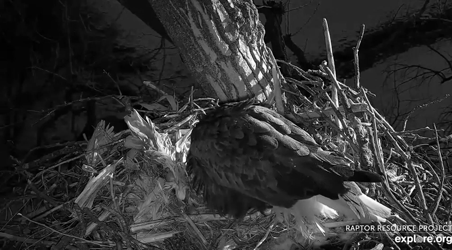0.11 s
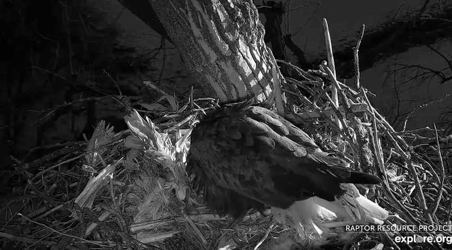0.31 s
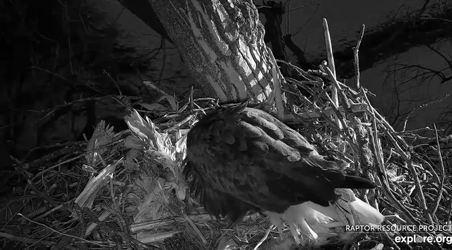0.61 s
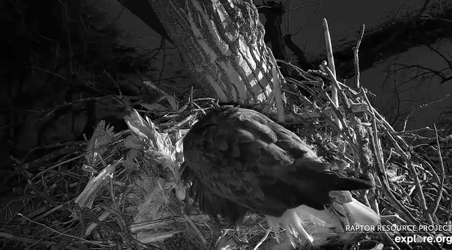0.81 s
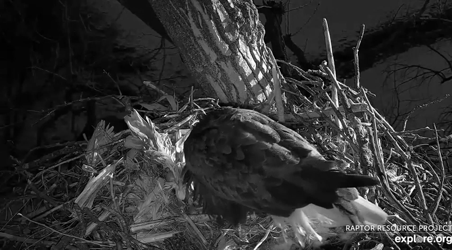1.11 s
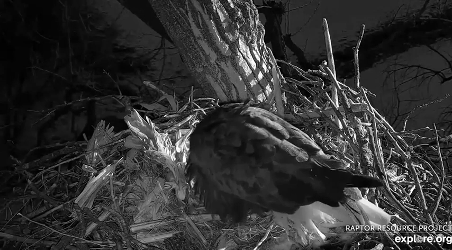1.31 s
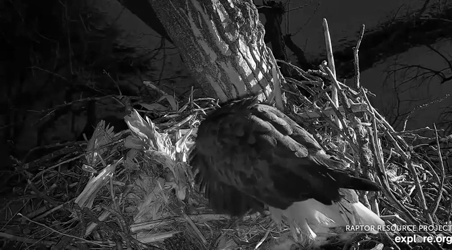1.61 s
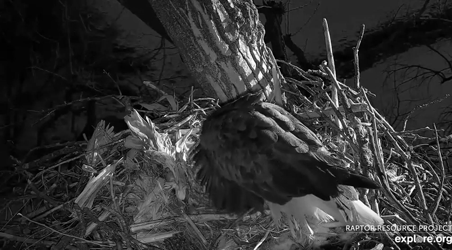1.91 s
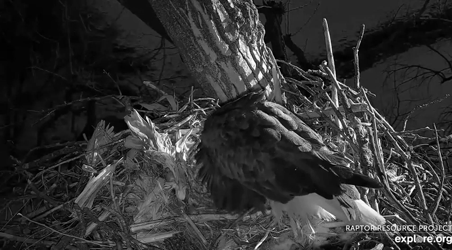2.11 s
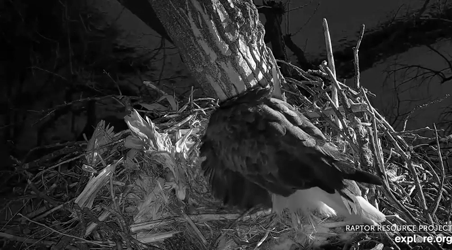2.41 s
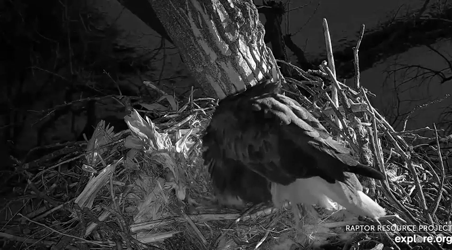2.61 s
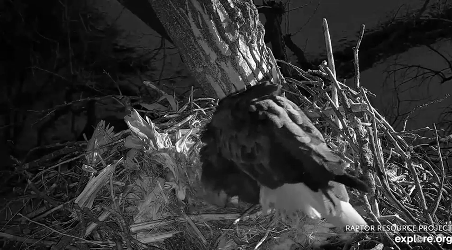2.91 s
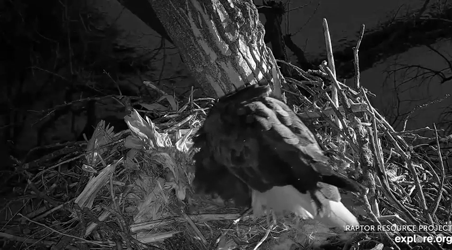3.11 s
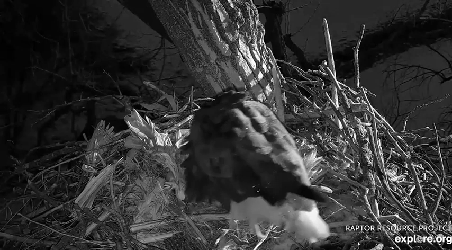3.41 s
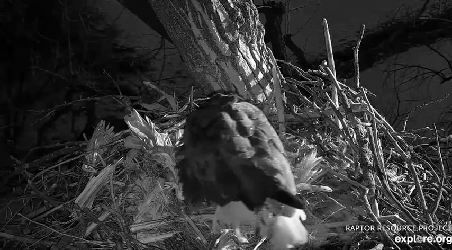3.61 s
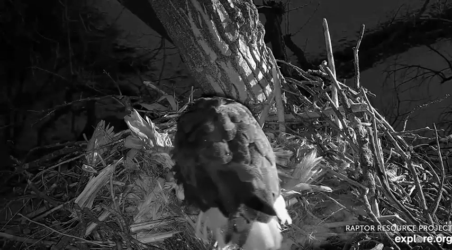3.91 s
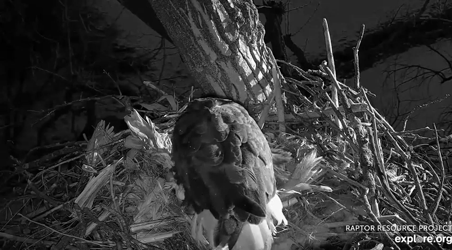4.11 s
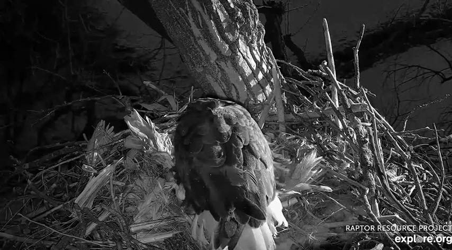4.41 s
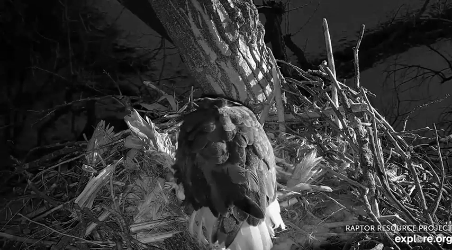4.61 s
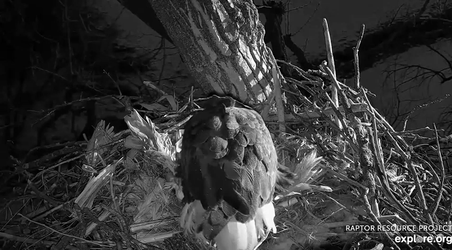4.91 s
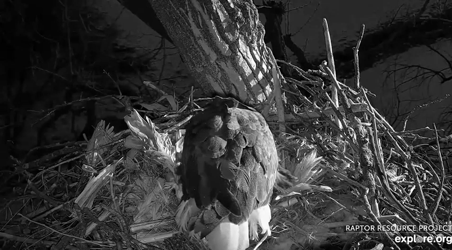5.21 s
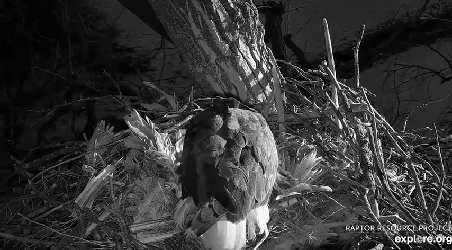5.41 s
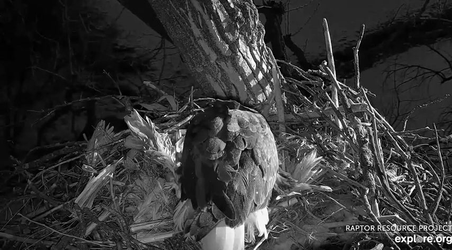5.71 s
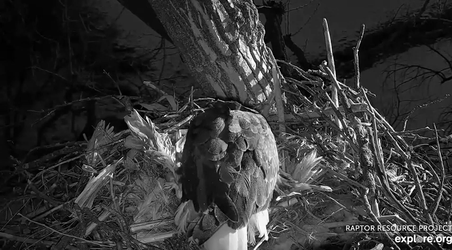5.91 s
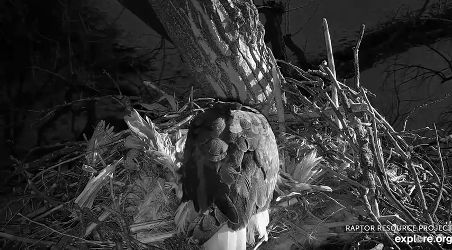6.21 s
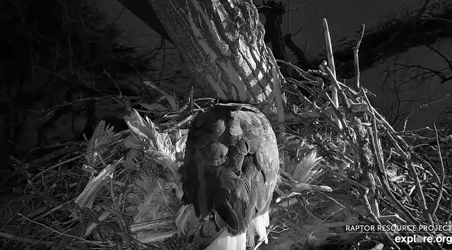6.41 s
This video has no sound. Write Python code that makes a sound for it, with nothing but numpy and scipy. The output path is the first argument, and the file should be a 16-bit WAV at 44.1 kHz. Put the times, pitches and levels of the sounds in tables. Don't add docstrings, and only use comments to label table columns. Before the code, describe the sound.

Outdoor nest in wooded surroundings, with constant low-to-mid water noise behind. An eagle nearby utters rapid piercing chirps and gliding whistles in three bursts, early, middle and end, the high ones splintering hoarsely. Between them are a short stuttering wooden creak, light plumage rustle, dry twig ticks and faint bird notes. The close microphone gives slightly gritty, overloaded loud notes with a metallic edge, limited treble and a bright tree echo.

```python
import sys
import numpy as np
from scipy import signal
from scipy.fft import rfft, irfft, next_fast_len
from scipy.io import wavfile
from scipy.ndimage import uniform_filter1d, map_coordinates

SR = 44100
rng = np.random.default_rng(int(sys.argv[2]) if len(sys.argv) > 2 else 0)


def invert_db(level):
    return 10 ** (np.asarray(level, dtype=float) / 20)


def digitize_waveform(pressure):
    field = np.atleast_2d(pressure).T
    bounded = np.clip(field, -1, 1)
    quanta = np.round(bounded * 32767).astype(np.int16)
    wavfile.write(sys.argv[1], SR, quanta)


N = 289737

# start_s, length_ms, level_db
HOARSE_STRETCHES = [
    (0.53, 65, -40),
    (0.635, 75, -38),
    (0.795, 55, -32.5),
    (2.0, 110, -62),
    (3.56, 105, -38),
    (3.67, 95, -36.5),
    (3.761, 80, -41),
    (6.101, 170, -38),
    (6.24, 88, -38),
]


def unit(x):
    return x / np.sqrt(np.mean(x ** 2) + 1e-20)


def along(hz_points, values, hz):
    return np.interp(np.log(hz + 1), np.log(np.asarray(hz_points) + 1), values)


def filtered(x, response):
    m = next_fast_len(N + SR // 2)
    return irfft(rfft(x, m) * response(np.fft.rfftfreq(m, 1 / SR)), m)[:N]


def coloured(points):
    hz_points, db = np.transpose(points)
    return unit(filtered(rng.standard_normal(N), lambda hz: invert_db(along(hz_points, db, hz))))


def wobble(rate_hz):
    knots = rng.standard_normal(int(N * rate_hz / SR) + 4)
    return map_coordinates(knots, [np.arange(N) * rate_hz / SR])


def mode(hz, centre_hz, width_hz):
    return 1j * hz * width_hz / (centre_hz ** 2 - hz ** 2 + 1j * hz * width_hz)


def impulses(start_s, peak_db):
    blows = np.zeros(N)
    for s, db in zip(start_s, peak_db):
        blows[round(s * SR)] = invert_db(db)
    return blows


def dying(t60_s):
    return invert_db(-60 * np.arange(SR // 20) / SR / t60_s)


def stream():
    # hz, level_db (per Hz)
    water_spectrum = [(12, -51), (20, -22), (64, -7), (97, -7.5), (252, -5.5), (295, -7), (450, -4.5),
                      (743, -0.5), (1480, -6), (1870, -12.5), (3530, -25), (4590, -28), (5520, -27),
                      (9870, -38.5), (11000, -48), (14300, -84), (22000, -120)]
    water_db, drone_db, drone_hz = -33, -59, 74.6
    z = signal.stft(coloured(water_spectrum), nperseg=512)[2]
    patches = uniform_filter1d(uniform_filter1d(rng.standard_normal(z.shape), 3, 0), 8, 1)
    rush = signal.istft(z * invert_db(1.92 * unit(patches)), nperseg=512)[1][:N]
    drone = unit(filtered(rng.standard_normal(N), lambda hz: mode(hz, drone_hz, 2.6) ** 2))
    swell_db = 0.6 * wobble(3.35)
    return invert_db(water_db + swell_db) * unit(rush) + invert_db(drone_db) * drone


def valley(x):
    # hz, t60_s, level_db
    decay_bands = [(3300, 0.56, -4), (3420, 0.97, -7), (4000, 0.6, 0.5), (4400, 0.5, -2.5), (5300, 0.35, 2),
                   (6260, 0.19, 1), (7150, 0.63, 7), (10400, 0.44, -2)]
    gap_samples = 250
    band_hz, t60_s, band_db = np.transpose(decay_bands)
    hz, t, z = signal.stft(rng.standard_normal(SR), SR, nperseg=256)
    start_db = along(band_hz, band_db, hz)[:, None]
    fade_db = start_db - 60 * t / along(band_hz, t60_s, hz)[:, None]
    near_branches = 1 + invert_db(1 - 60 * t / 0.06)
    tail = signal.istft(z * invert_db(fade_db) * near_branches, SR, nperseg=256)[1]
    tail *= invert_db(2.5 * wobble(60)[:len(tail)])
    return signal.fftconvolve(np.pad(x, (gap_samples, 0)), tail / np.linalg.norm(tail))[:N]


def rustle():
    # start_s, level_db
    brushes = [
        [(1.68, -58), (1.72, -42), (1.8, -57)],
        [(2.6, -70), (2.736, -51), (3.3, -71)],
    ]
    t = np.arange(N) / SR
    level = sum(invert_db(np.interp(t, *np.transpose(rows), left=-120, right=-120)) for rows in brushes)
    spectrum = [(1500, -1), (4000, 7), (7000, 9), (11000, -19)]
    return level * unit(invert_db(6.7 * wobble(160)) * coloured(spectrum))


def ticks():
    # start_s, peak_db
    tick_rows = [(1.8473, -40), (2.163, -34), (2.743, -26.5), (2.766, -38), (2.8887, -39), (3.246, -47),
                 (3.6748, -19), (0.22, -47), (2.666, -47), (5.121, -40), (5.14, -44), (5.295, -44),
                 (5.414, -46), (5.475, -47), (5.555, -48), (5.588, -45), (5.602, -39), (5.84, -48),
                 (6.176, -23)]
    cracks = np.convolve(impulses(*np.transpose(tick_rows)), dying(0.02))[:N]
    return cracks * coloured([(1500, 7.5), (5000, 7.0), (9000, 2), (11000, -33)])


def creaking_stick():
    # start_s, peak_db, snap_db, ring_hz
    slip_rows = [
        (1.717, -21, -3, 5000),
        (1.727, -15.5, -5.5, 3050),
        (1.7368, -12.5, -8.5, 3200),
        (1.7465, -11, -13, 2900),
        (1.7568, -13, -10.5, 3200),
        (1.7675, -16, -7, 3300),
        (1.777, -16, -14, 2800),
        (1.789, -16, -9.5, 3400),
    ]
    start_s, peak_db, snap_db, ring_hz = np.transpose(slip_rows)
    thump = filtered(impulses(start_s, peak_db + 29.5),
                     lambda hz: mode(hz, 250, 250) / (1 + 1j * hz / 1100) ** 2)
    snap = np.convolve(impulses(start_s, peak_db + snap_db - 4), dying(0.025))[:N]
    snap = snap * invert_db(1.8 * wobble(350)) * coloured([(1500, 3), (3000, 7), (4800, -5), (7000, -49)])
    rings = np.zeros(N)
    decay = dying(0.028)
    t = np.arange(len(decay)) / SR
    for s, db, hz in zip(start_s, peak_db + snap_db - 3, ring_hz):
        rings[round(s * SR):][:len(t)] += invert_db(db) * decay * np.sin(2 * np.pi * hz * t)
    return thump + snap + rings


def breath_puffs():
    # start_s, peak_db
    puff_rows = [
        (0.462, -32),
        (0.927, -33),
        (1.18, -27),
    ]
    start_s, peak_db = np.transpose(puff_rows)
    return filtered(impulses(start_s, peak_db + 49), lambda hz: mode(hz, 32, 45))


def whistles(strokes, octave_db):
    # hz, flutter_depth, breath_db
    hoarseness = [(2000, 0.55, -42), (3000, 0.24, -27), (4400, 0.19, -24.5), (5200, 0.43, -8.5),
                  (6500, 0.21, -28), (7600, 0.28, -2)]
    # hz, level_db
    breath_spectrum = [(1200, -26), (2000, 5), (3000, 3.5), (4300, 11), (6000, 4), (7500, -5), (10500, -48),
                       (12000, -16)]
    throat_hz, depth, breath_db = np.transpose(hoarseness)
    tone, leak_power = np.zeros((2, N + SR))
    flutter = np.append(wobble(700), np.zeros(SR))
    waver = np.append(wobble(180), np.zeros(SR))
    for first, hz, shape in strokes:
        at = slice(first, first + len(hz))
        hz = hz * (1 + 0.0079 * waver[at])
        phase = 2 * np.pi * (rng.random() + np.cumsum(hz) / SR)
        octave = invert_db(octave_db - 16 * np.log2(hz / 3300)) * (hz < 5200)
        voiced = np.sin(phase) + octave * np.sin(2 * phase)
        tone[at] += shape * voiced * (1 + along(throat_hz, depth, hz) * flutter[at])
        leak_power[at] += (shape * invert_db(along(throat_hz, breath_db, hz))) ** 2
    return tone[:N] + np.sqrt(np.abs(leak_power[:N])) * coloured(breath_spectrum)


def glides(rows, swell):
    plateau_ms = 11
    for s, ms, start_hz, end_hz, db, peak in rows:
        u = np.linspace(0, 1, int((ms + 3) * SR / 1000))
        arch = np.sin(np.pi * np.interp(u, [0, np.clip(peak, 0.25, 0.8), 1], [0, 0.5, 1]))
        shape = invert_db(db) * arch ** (swell * min(1, plateau_ms / ms) ** 0.5)
        yield round(s * SR) - 66, start_hz + (end_hz - start_hz) * u, shape


def faint_birds():
    # start_s, length_ms, start_hz, end_hz, level_db
    faint_rows = [(0.005, 46, 3340, 2310, -48), (1.275, 20, 2700, 2420, -39),
                  (1.579, 9.8, 2820, 3000, -35.5), (1.586, 13, 3360, 3550, -39),
                  (1.672, 6.4, 4200, 6400, -38), (1.94, 9.5, 2900, 3080, -30), (1.947, 6, 3480, 3900, -33),
                  (2.026, 15, 4760, 4890, -31), (2.052, 8.7, 4800, 4300, -32), (3.11, 9.9, 2100, 2030, -38),
                  (3.578, 14, 2000, 1780, -31.5), (3.63, 35, 2090, 2180, -36.5),
                  (4.284, 27, 2596, 2490, -33), (4.45, 32, 319, 302, -36.5), (5.137, 22, 5900, 4500, -55),
                  (5.21, 37.4, 3680, 3350, -47.5), (5.243, 24, 3360, 2780, -44),
                  (5.732, 12, 4550, 3600, -48), (5.743, 21, 3580, 3050, -45), (5.768, 18, 2950, 2200, -46),
                  (1.729, 6.5, 4750, 4500, -35), (1.756, 7.1, 4900, 4830, -38),
                  (1.717, 13, 6850, 6850, -37), (1.731, 9, 7150, 6930, -46), (3.596, 7, 3360, 2700, -31),
                  (1.931, 8, 3560, 2900, -38), (5.923, 14, 4720, 3700, -50), (5.936, 25, 3650, 3050, -51),
                  (5.958, 22, 2950, 2200, -49), (6.15, 39.5, 2090, 1890, -29.5),
                  (6.173, 14, 2970, 3550, -26.5)]
    calls = whistles(glides([(*row, 0.45) for row in faint_rows], swell=0.6), octave_db=-45)
    flicker_db = 4 * (np.tanh(wobble(130)) + 0.5)
    return calls * invert_db(flicker_db)


def rasp():
    level = np.zeros(N)
    for s, ms, db in HOARSE_STRETCHES:
        count = int(ms * SR / 1000)
        level[round(s * SR):][:count] += invert_db(db) * np.sin(np.linspace(0, np.pi, count)) ** 0.43
    spectrum = [(2300, -12), (3200, -10), (4200, 0.0), (6300, 8.0), (7400, -14.0), (9000, -25)]
    return level * unit(invert_db(2.8 * wobble(250)) * coloured(spectrum))


def shards():
    gap_ms, length_ms, centre_hz, spread, slide_share, over_rasp_db = 5, 3, 5500, 0.14, 0.12, 4
    rows = []
    for s, ms, db in HOARSE_STRETCHES:
        for i in range(int(ms / gap_ms)):
            late, pitch, slide, size = rng.standard_normal(4)
            hz = centre_hz * np.exp(spread * np.clip(pitch, -2, 2))
            bend = slide_share * slide
            start_s = s + (i + 1 + late / 2) * gap_ms / 1000
            level_db = db + over_rasp_db + 3 * size
            rows.append((start_s, length_ms, hz * (1 - bend), hz * (1 + bend), level_db, 0.31))
    return rows


def squeals():
    # start_s, pitch_hz, level_db
    first_squeals = [
        [(.523, 4300, -16), (.528, 6080, -9.5), (.534, 6580, -17.5), (.541, 6600, -8.5), (.5455, 6030, -6),
         (.548, 4300, -11)],
        [(.549, 5120, -20), (.554, 5300, -20), (.559, 6100, -17), (.563, 5900, -27), (.568, 6110, -16),
         (.578, 6300, -19), (.586, 6140, -16), (.59, 5940, -12), (.595, 5000, -20)],
        [(.629, 7310, -15), (.634, 6450, -6), (.638, 5780, -5), (.641, 4400, -11)],
        [(.64, 6100, -8), (.647, 5780, -14.5), (.653, 6160, -4), (.657, 5970, -22), (.661, 5880, -15.5),
         (.671, 6300, -21), (.684, 6050, -11.5), (.692, 5350, -18)],
        [(.692, 5450, -12), (.703, 4400, -26), (.711, 3610, -26), (.72, 3160, -21.5), (.728, 2950, -44)],
    ]
    later_squeals = [
        [(3.561, 5520, -24), (3.568, 6450, -30), (3.582, 6830, -21), (3.587, 6100, -22), (3.59, 3000, -32)],
        [(3.592, 6080, -33), (3.62, 6500, -39), (3.64, 6580, -36), (3.65, 6250, -38)],
        [(3.668, 6400, -27), (3.673, 5820, -19), (3.677, 3400, -22)],
        [(3.676, 6550, -21), (3.692, 5440, -28), (3.708, 5900, -25), (3.724, 5600, -28), (3.73, 5200, -33),
         (3.736, 4560, -30), (3.742, 3940, -33), (3.749, 3460, -23.5), (3.757, 3320, -40)],
    ]
    last_squeals = [
        [(6.097, 4600, -36), (6.102, 5910, -19), (6.108, 5580, -30), (6.115, 4930, -17), (6.119, 4900, -24)],
        [(6.118, 5980, -20), (6.123, 5700, -17), (6.132, 5500, -36)],
        [(6.134, 4900, -29), (6.14, 5840, -20), (6.146, 6110, -22), (6.15, 6900, -25), (6.168, 7180, -34),
         (6.175, 6930, -22), (6.18, 5460, -16.5), (6.184, 3440, -19)],
        [(6.185, 6400, -36), (6.24, 6650, -31), (6.268, 6620, -35), (6.28, 5850, -24), (6.292, 4700, -26.5),
         (6.304, 3470, -33.5), (6.311, 3154, -13), (6.317, 3110, -18), (6.328, 3120, -38)],
    ]
    # pitch_hz, lift_db
    throat_lift = [(3000, -2.5), (3300, 7.5), (3850, 0), (4400, 6.5), (4900, 0), (5300, -4), (6100, -2),
                   (7200, -3)]
    # delay_ms, level_db
    bough_echoes = [
        (4.5, -7),
        (10, -9.5),
        (17, -13),
        (29, -17),
    ]
    break_db, break_share, break_above_hz = 7, 0.017, 3500
    level, pitch = wobble(340), unit(wobble(90) + wobble(350))
    for rows in list(first_squeals) + list(later_squeals) + list(last_squeals):
        s, hz, db = np.transpose(rows)
        at = np.arange(round(s[0] * SR), round(s[-1] * SR))
        hz = np.interp(at / SR, s, hz)
        strain = np.clip((hz - break_above_hz) / 1500, 0, 1)
        ends = np.clip(np.minimum(at - at[0], at[-1] - at) / 66, 0, 1)
        db = np.interp(at / SR, s, db) + along(*np.transpose(throat_lift), hz)
        db = db + break_db * strain * np.tanh(level[at])
        hz = hz * (1 + break_share * strain * pitch[at])
        yield at[0], hz, ends * invert_db(db - 1)
        for delay_ms, loss_db in bough_echoes:
            yield at[0] + round(delay_ms * SR / 1000), hz, ends * invert_db(db + loss_db)


def chitter():
    # start_s, length_ms, middle_hz, level_db
    rising = [(0.441, 10, 5120, -25), (0.456, 12, 4240, -6), (0.491, 7.4, 4230, -27),
              (0.531, 8.8, 4270, -29), (0.802, 10, 5450, -22), (0.911, 8.3, 3366, -12),
              (0.913, 10.6, 4274, -8), (1.041, 9.3, 3340, -6.5), (1.6, 11.7, 4000, -14),
              (1.613, 13, 4850, -38), (1.619, 15, 4015, -18.5), (1.688, 31, 7600, -32),
              (1.953, 22.4, 4000, -15), (2.038, 21.5, 4980, -22.5), (3.499, 15, 4310, -16),
              (3.517, 15, 4260, -26), (3.55, 10, 4300, -31), (3.595, 10, 5200, -33),
              (3.834, 13.7, 4515, -9.5), (3.977, 10.4, 3420, -6), (3.99, 13, 3510, -6),
              (4.039, 5.3, 3470, -17), (6.018, 10.4, 3460, -10.5), (6.105, 12, 3350, -13.5),
              (6.14, 27, 4215, -22), (6.219, 14, 4230, -25), (6.396, 12, 3420, -18.5),
              (6.4, 25, 4400, -16.5), (6.546, 11, 3130, -20.5), (6.558, 15.5, 3270, -13)]
    held_notes = [(0.475, 16, 5000, -20.5), (0.509, 14, 4225, -21.5), (0.597, 14, 4310, -29),
                  (2.115, 26, 4170, -45), (0.546, 5.9, 5240, -15), (0.637, 3.2, 4390, -12),
                  (0.786, 12.6, 4400, -2.5), (0.912, 9, 5240, -17.5), (0.926, 17.2, 4400, -3),
                  (1.044, 11, 5260, -20), (1.047, 16, 4170, -13.5), (1.61, 7, 4100, -24),
                  (1.631, 28, 4660, -29), (1.655, 36, 3950, -36), (1.974, 13, 4050, -27),
                  (2.012, 24, 5800, -40), (3.476, 20, 3380, -35), (3.54, 22, 3390, -23.5),
                  (3.636, 10, 4300, -25), (3.674, 5.8, 3350, -19), (3.675, 13, 4380, -20.5),
                  (4.137, 29, 3403, -4), (4.168, 11.6, 3414, -13), (6.03, 16, 4280, -16.5),
                  (6.051, 17, 4280, -16.5), (6.074, 32, 4270, -10.5), (6.122, 17, 4246, -15.5),
                  (6.207, 13, 4300, -34), (6.555, 9.8, 4450, -24.5), (6.437, 4.4, 4500, -13),
                  (6.449, 9.1, 4400, -20.5)]
    sagging = [(0.463, 15, 4333, -5.5), (0.476, 12, 5940, -22), (0.819, 7.7, 4390, -7.5),
               (1.057, 6.6, 4335, -10), (1.174, 21.3, 3218, -4), (1.999, 11, 4700, -29),
               (2.0, 24, 4030, -38), (2.058, 18.4, 4200, -23), (2.08, 16, 5120, -37),
               (2.082, 19, 4250, -34.5), (3.484, 24, 4080, -18.5), (3.529, 18, 4300, -24),
               (3.561, 28, 4300, -29), (3.824, 7.9, 4970, -19), (3.836, 15, 5620, -24),
               (3.848, 21.4, 4640, -10), (3.871, 6.8, 4730, -21), (3.879, 9.8, 4540, -18.5),
               (3.895, 37, 4610, -23.5), (3.998, 14, 4477, -8), (4.009, 19, 3516, -13),
               (4.127, 17, 3420, -16), (4.284, 19, 3270, -13), (4.3, 18.7, 3292, -14),
               (4.41, 32, 3380, -31), (6.106, 23, 4280, -19), (6.418, 14.5, 4550, -10)]
    # start_s, length_ms, level_db
    lead_up = [
        (0.438, 19, -20),
        (1.039, 13, -19),
        (2.025, 10, -31),
        (6.004, 20, -25.5),
    ]
    swoop_in = [
        (0.777, 6.7, -10.5),
        (0.906, 7.7, -20),
        (6.39, 7.3, -25),
    ]
    fall_off = [(0.484, 21, -20.5), (0.835, 12, -28), (0.945, 14, -21), (1.073, 11, -14.5),
                (1.169, 5.2, -33), (3.522, 21, -28), (3.882, 15, -26), (6.03, 49, -29), (6.448, 18, -30)]
    rows = []
    for notes, glide, peak in [(rising, 0.035, 0.54), (held_notes, 0.003, 0.58), (sagging, -0.033, 0.43)]:
        for s, ms, hz, db in notes:
            rows.append((s, ms, hz * (1 - glide / 2), hz * (1 + glide / 2), db, peak))
    for slides, start_hz, end_hz, peak in [(lead_up, 3790, 4520, 0.51), (swoop_in, 6300, 4600, 0.27),
                                           (fall_off, 3900, 3270, 0.89)]:
        rows += [(s, ms, start_hz, end_hz, db, peak) for s, ms, db in slides]
    return rows


def eagle():
    strokes = [*glides(chitter() + shards(), swell=0.86), *squeals()]
    return invert_db(0.5) * (whistles(strokes, octave_db=-23) + rasp())


def scene():
    valley_db = -9
    birds = eagle() + faint_birds()
    nest = rustle() + ticks() + creaking_stick() + breath_puffs()
    return (stream() + nest + birds + invert_db(valley_db) * valley(birds))[None]


def roll_off(x):
    return signal.sosfilt(signal.butter(12, 11120, fs=SR, output="sos"), x)


def record(dry):
    capture_hz, edge_hz = 48000, 10725
    top, hardness = 0.55, 8
    captured = signal.resample_poly(dry[0], 160, 147)
    captured = captured / (1 + np.abs(captured / top) ** hardness) ** (1 / hardness)
    held = np.zeros(N)
    held[::2] = 2 * captured[np.arange(0, N, 2) * capture_hz // SR]
    mix = filtered(held, lambda hz: (hz < 11300) / (1 + (hz / edge_hz) ** 70))[None]
    return roll_off(mix)


dry = scene()
out = record(dry)
digitize_waveform(out)
```